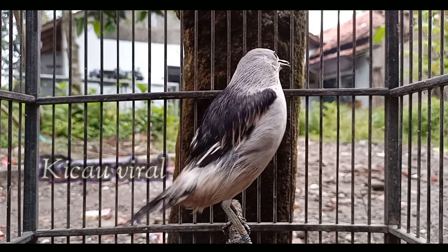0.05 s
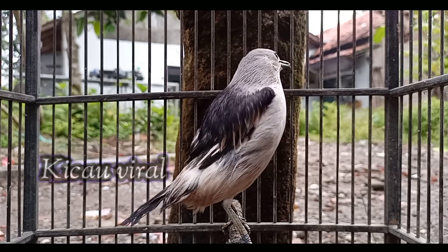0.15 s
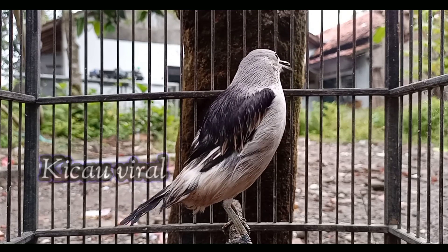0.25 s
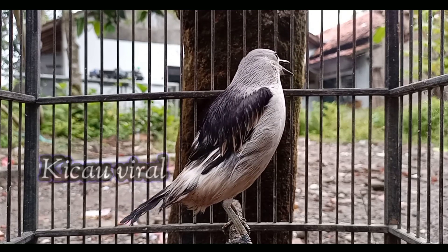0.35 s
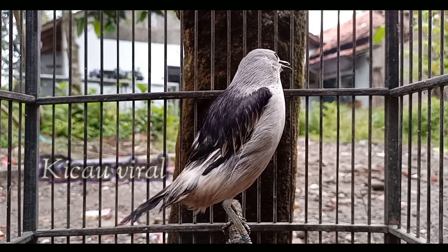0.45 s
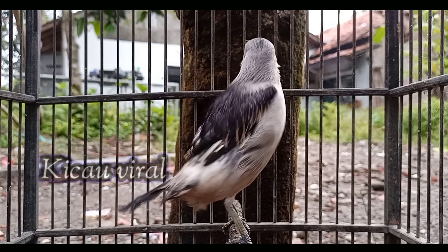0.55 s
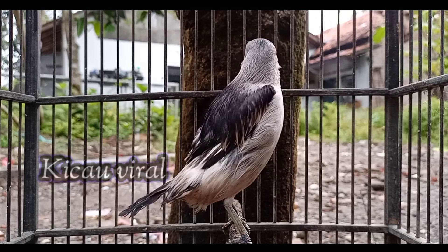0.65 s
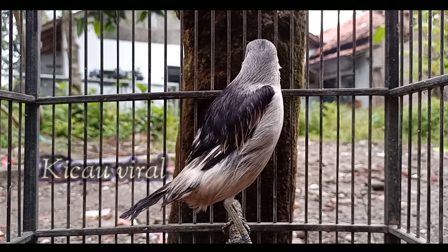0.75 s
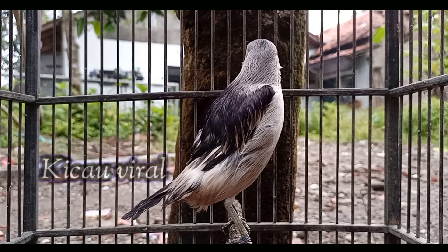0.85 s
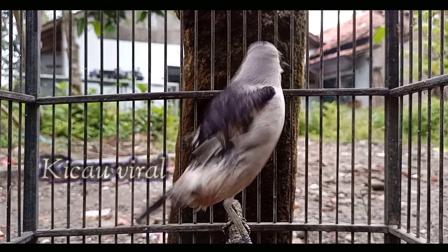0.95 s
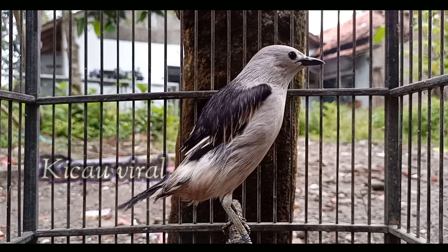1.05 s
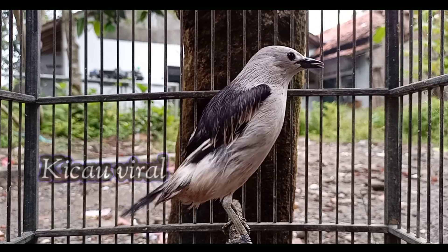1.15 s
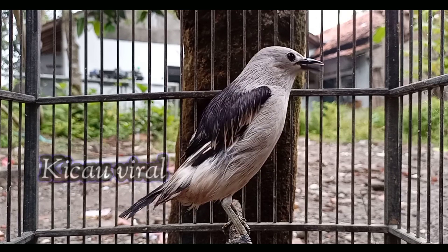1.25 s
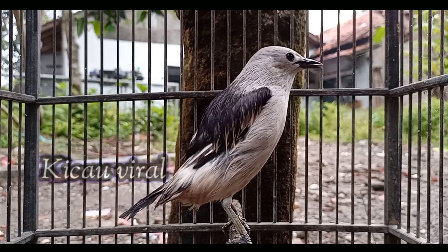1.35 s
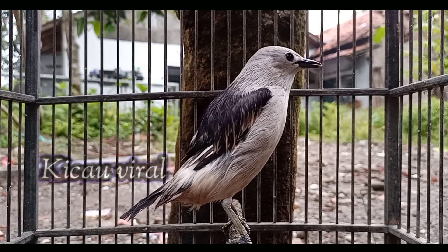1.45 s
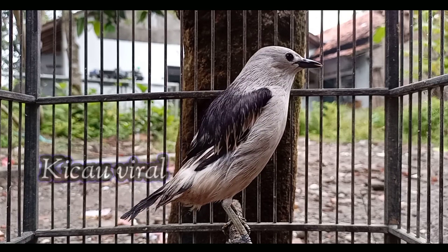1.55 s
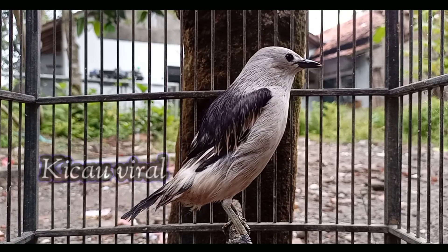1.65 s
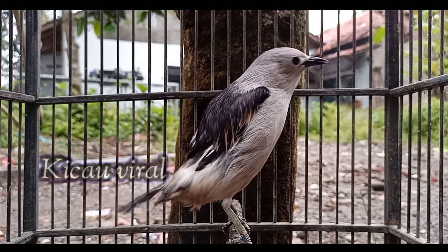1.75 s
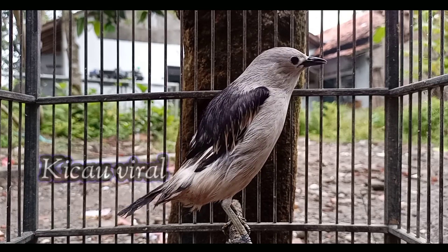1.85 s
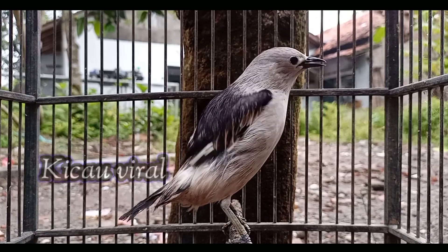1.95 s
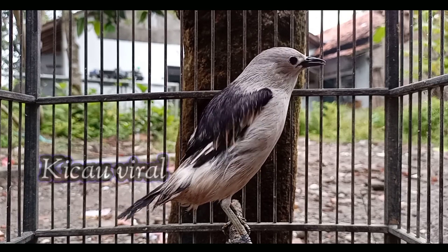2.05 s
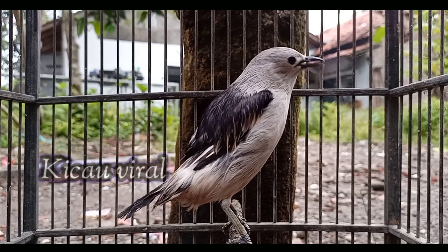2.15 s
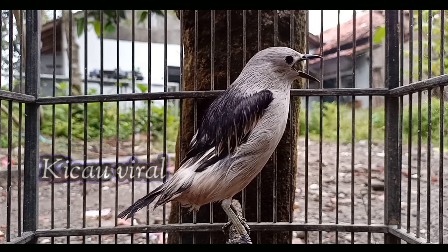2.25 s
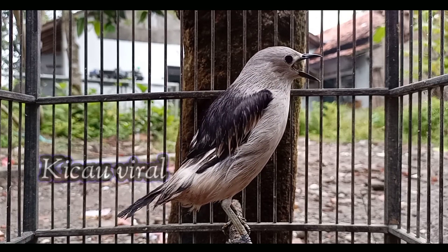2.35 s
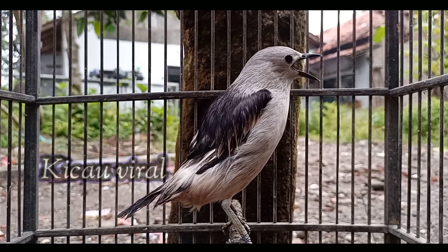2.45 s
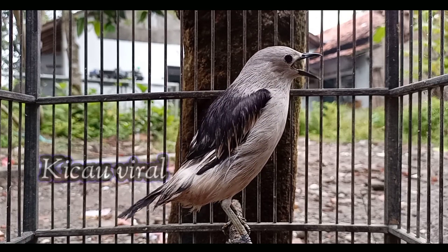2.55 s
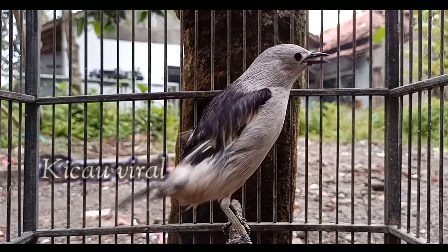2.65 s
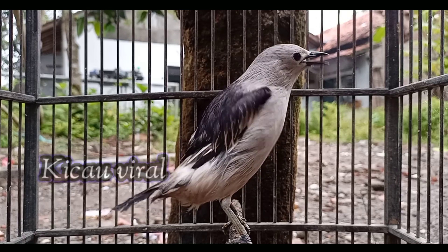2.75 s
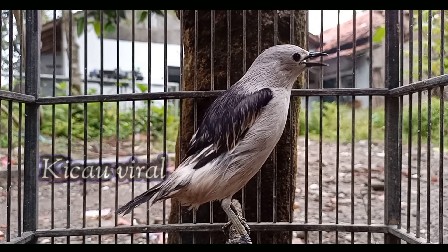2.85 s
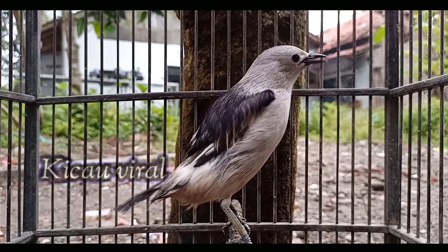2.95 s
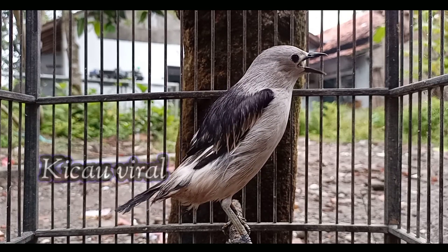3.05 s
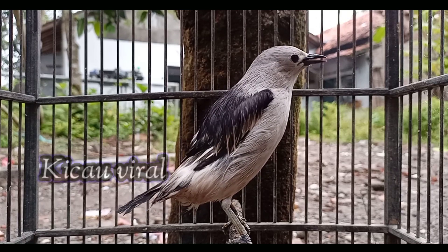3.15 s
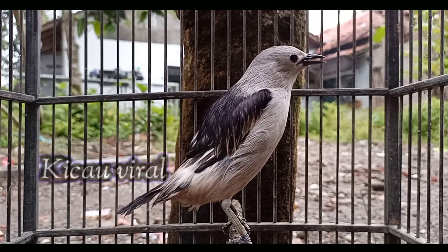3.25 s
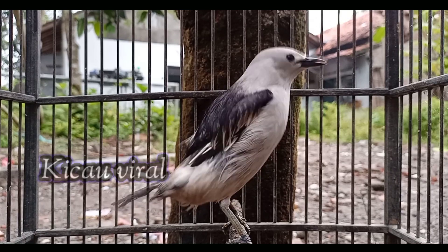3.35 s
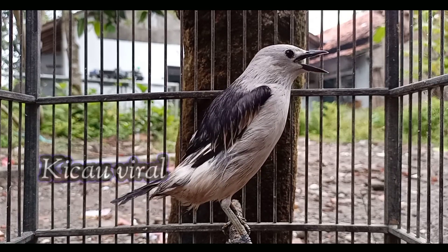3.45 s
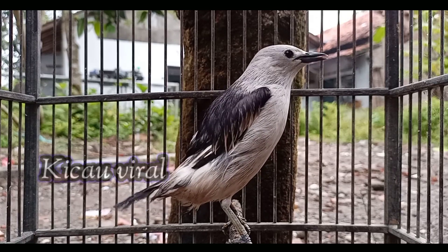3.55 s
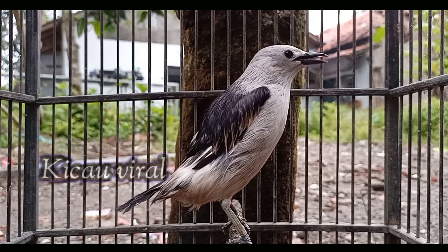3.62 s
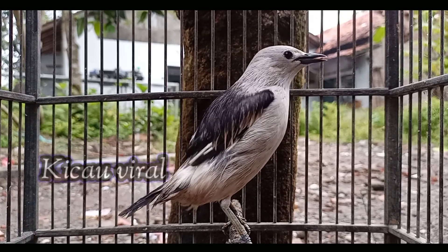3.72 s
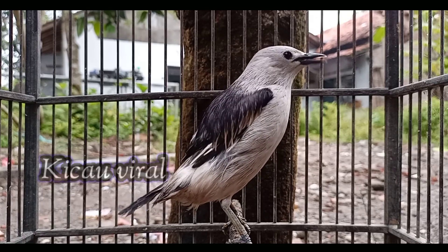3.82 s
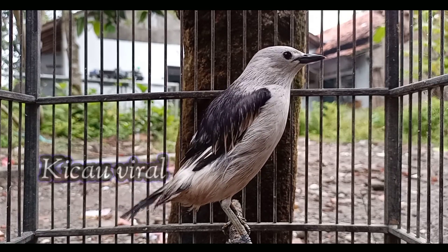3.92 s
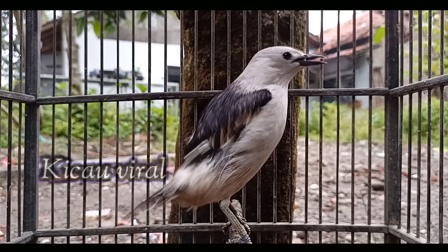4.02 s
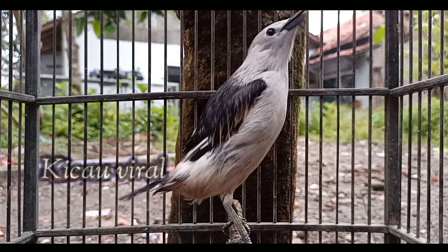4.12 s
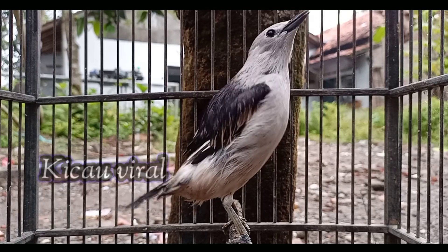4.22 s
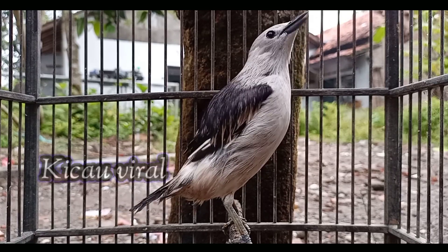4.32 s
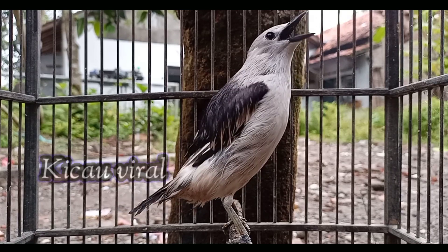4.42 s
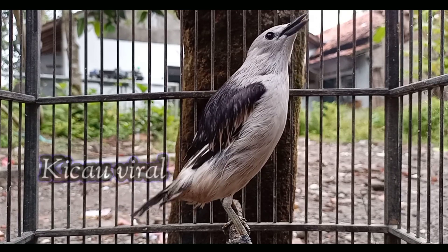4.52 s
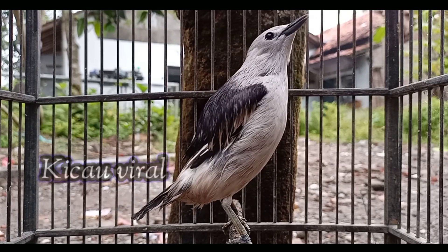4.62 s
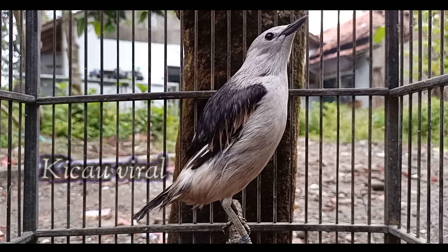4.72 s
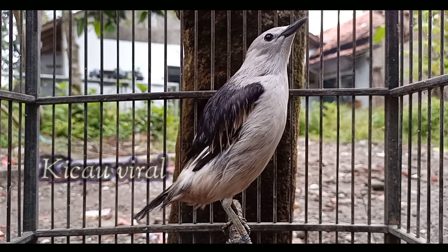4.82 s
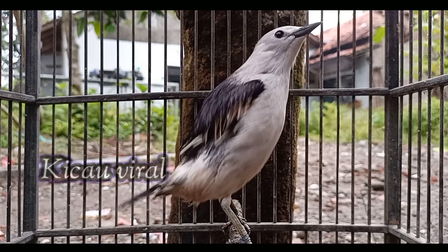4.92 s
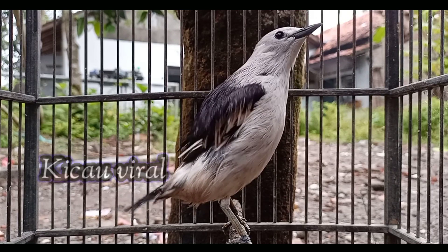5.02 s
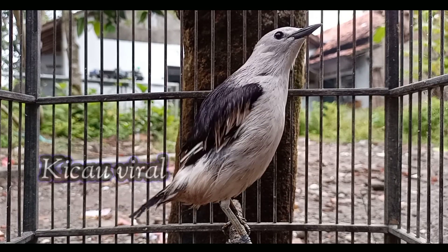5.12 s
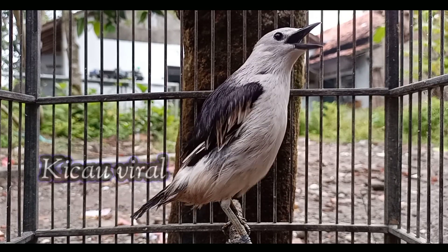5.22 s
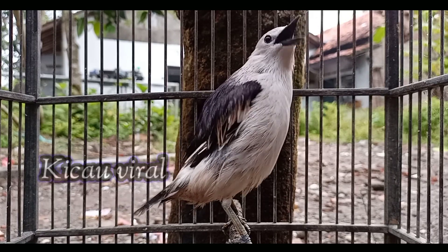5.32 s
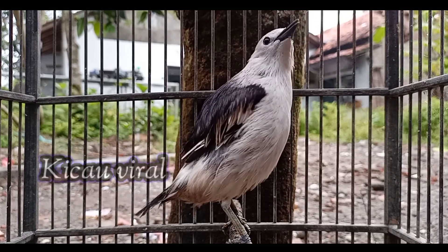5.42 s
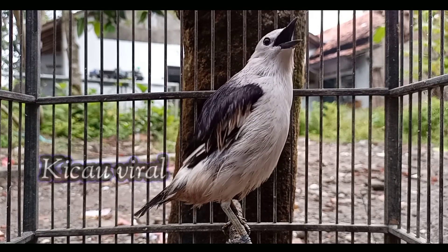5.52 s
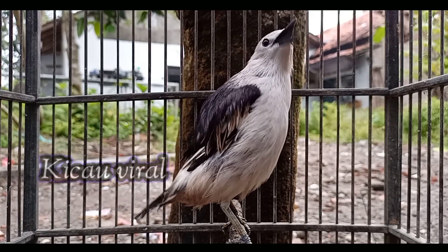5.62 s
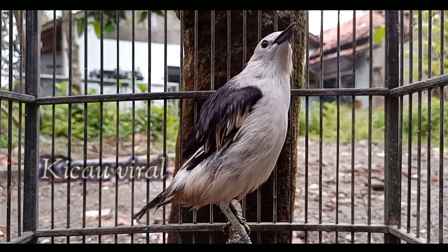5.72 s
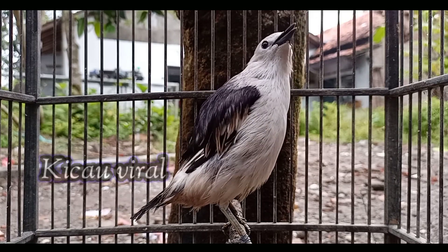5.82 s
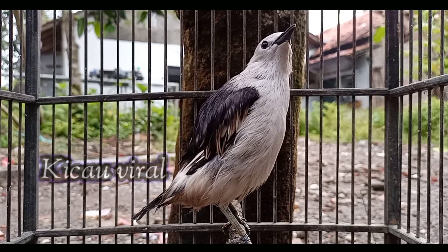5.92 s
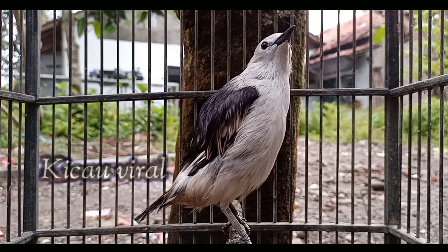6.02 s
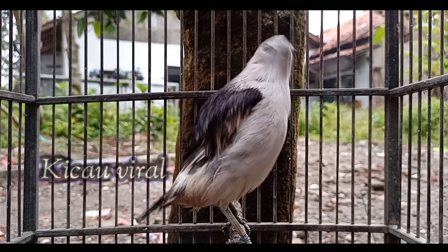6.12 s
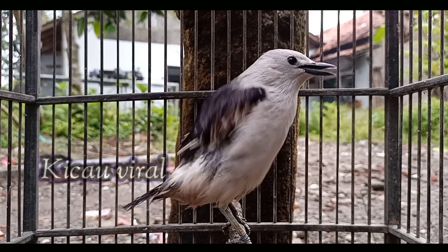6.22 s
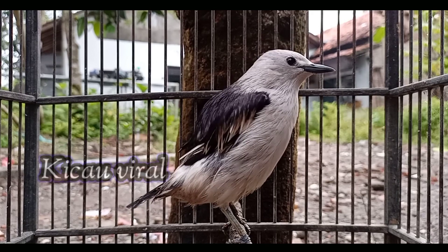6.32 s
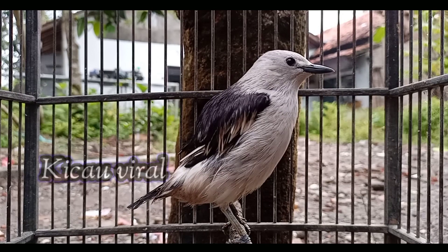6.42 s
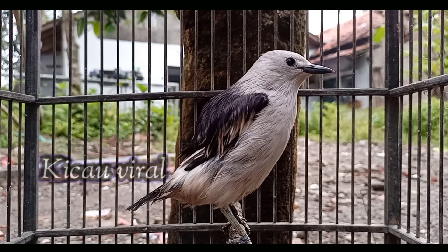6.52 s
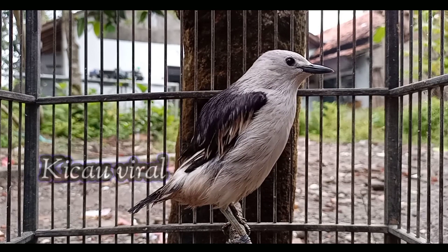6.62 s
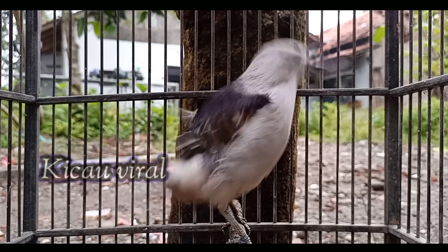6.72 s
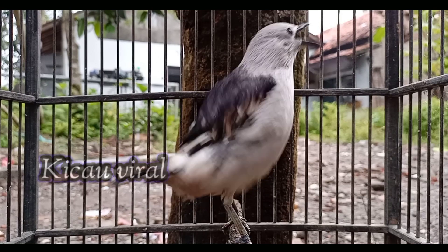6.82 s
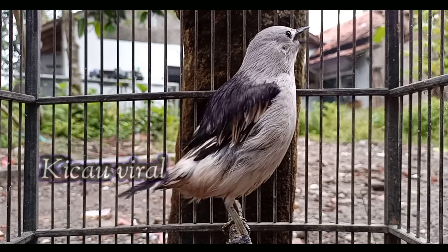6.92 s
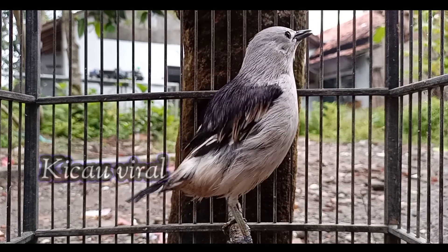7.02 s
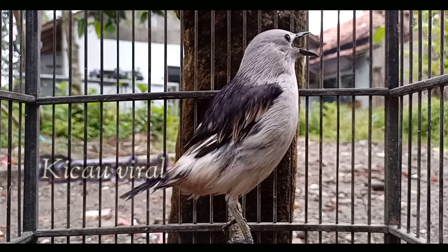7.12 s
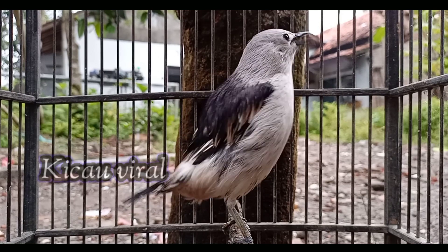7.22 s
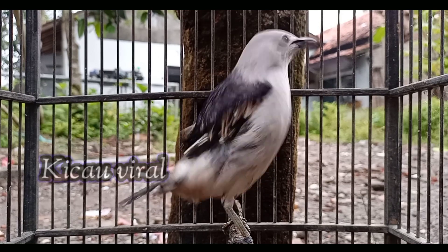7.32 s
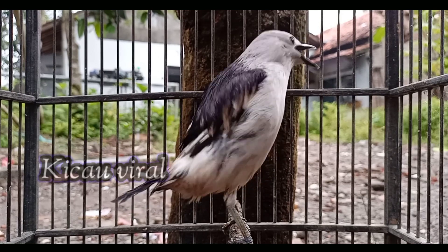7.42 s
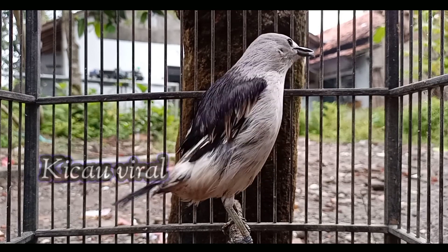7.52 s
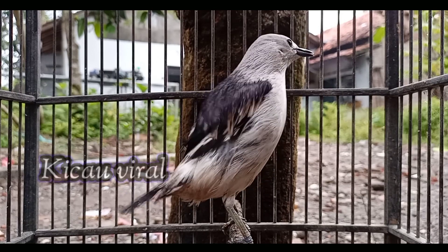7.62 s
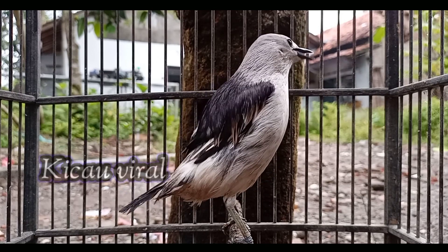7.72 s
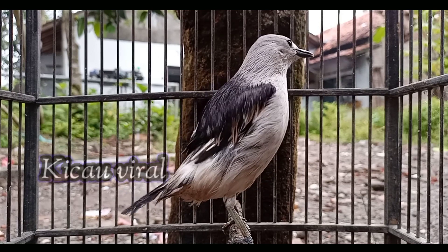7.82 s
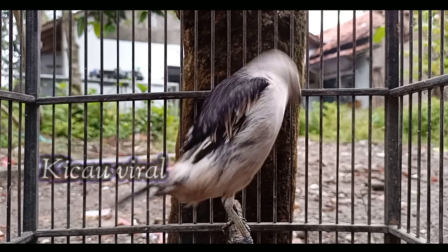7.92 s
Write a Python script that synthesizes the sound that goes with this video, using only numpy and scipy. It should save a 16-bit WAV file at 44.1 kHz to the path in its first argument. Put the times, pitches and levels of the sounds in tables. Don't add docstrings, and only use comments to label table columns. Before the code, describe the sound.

Outdoors in a yard, one bird dominates, crisp and close. Fast chirps and two-toned warbling lead to bouncing whistles, a harsh rattle and soaring piercing sweeps. After a pause it gives short barking notes, a soft feather rustle, paired hoots, and finally repeated breaking squawks with tiny clicks. Traffic rumble, a faint motor pass, insect ringing and distant falling whistles stay underneath, with only a brief echo.

```python
import sys
import numpy as np
from scipy import signal
from scipy.fft import rfft, irfft, next_fast_len
from scipy.io import wavfile
from scipy.ndimage import uniform_filter1d

SR = 44100
rng = np.random.default_rng(int(sys.argv[2]) if len(sys.argv) > 2 else 0)


def waveform_to_disk(signal):
    frames = np.transpose(np.atleast_2d(signal))
    scaled = np.clip(frames, -1, 1) * 32767
    samples = np.round(scaled).astype(np.int16)
    wavfile.write(sys.argv[1], SR, samples)


def gain_from_decibels(decibels):
    exponent = np.asarray(decibels, float) / 20
    return 10 ** exponent


N = 351477

# share of length (0-1), share of the glide to the aimed pitch, under_db
DROOP = [(0, 0.15, -7), (0.351, 0.28, 1.5), (1.001, 0.82, -5)]
SNAP = [(0, 0.1, 1), (1, 0.84, -2)]
# 2nd, 3rd, 4th, 5th harmonic over the first [dB]
CLEAR = (-23.5, -34.5, -48, -65)
THIN = (3, -7, -55, -64)


def curve(table, start=0, count=N):
    s, *columns = np.transpose(table)
    times = (start + np.arange(count)) / SR
    return [np.interp(times, s, column) for column in columns]


def unit(x):
    return x / np.sqrt(np.mean(x ** 2))


def wobble(hz, count=N):
    smooth = signal.butter(5, hz, fs=SR, output="sos")
    return unit(signal.sosfilt(smooth, rng.standard_normal(count + 2000))[2000:])


def swing(hz):
    return 2 * np.pi * np.cumsum(hz) / SR


def colour(x, points):
    hz, db = np.transpose(points)
    size = next_fast_len(len(x))
    f = np.maximum(np.arange(size // 2 + 1) * SR / size, 1)
    gain = gain_from_decibels(np.interp(np.log(f), np.log(hz), db))
    return irfft(rfft(x, size) * gain, size)[:len(x)]


def echo(x, t60, damp_hz):
    t = np.arange(int(.5 * SR)) / SR
    tail = rng.standard_normal(len(t)) * np.exp(-np.log(1000) * t / t60) * (t > .003)
    tail = signal.lfilter(*signal.butter(1, damp_hz, fs=SR), tail)
    return signal.fftconvolve(x, tail / np.sqrt(np.sum(tail ** 2)))[:N]


def lumpy(x):
    lump_db = 4
    edges = [(20, 120), (120, 220), (220, 330), (330, 480), (480, 700), (700, 1100), (1100, 20000)]
    out = np.zeros(N)
    for low_hz, high_hz in edges:
        band = signal.sosfilt(signal.butter(3, (low_hz, high_hz), "band", fs=SR, output="sos"), x)
        depth_db = lump_db * min(low_hz / 220, 1, 500 / low_hz)
        out += band * gain_from_decibels(depth_db * wobble(5))
    return out


def yard():
    # pitch_hz, level_db per Hz
    traffic_colour = [(21, -35.5), (35, -14.5), (172, -4), (332, -26), (1870, -56), (2690, -44),
                      (3610, -63.5), (8000, -62.5), (10400, -76.5), (17600, -120)]
    # time_s, level_db
    motor_level = [
        (1.1, -68.5),
        (1.4, -62),
        (1.9, -47.5),
        (3.1, -52),
        (3.6, -60.5),
        (4.2, -61.5),
        (4.8, -72.5),
        (7.97, -78),
    ]
    # pitch_hz, level_db
    motor_tones = [(489.9, -70), (532.9, -78), (667.5, -69.5)]
    rumble = unit(colour(rng.standard_normal(N), traffic_colour)) * gain_from_decibels(-53.5 + 1.5 * wobble(2))
    tones = np.zeros(N)
    for hz, db in motor_tones:
        pitch = hz * (1 + .01 * wobble(4) + .03 * wobble(40))
        tones += gain_from_decibels(db + 57 + 5 * wobble(3)) * np.sin(swing(pitch))
    road_colour = [(150, 2.0), (350, 2.0), (2000, -11.5), (6000, -14.5), (9000, -64.0)]
    road = unit(colour(rng.standard_normal(N), road_colour))
    passing = gain_from_decibels(curve(motor_level)[0])
    return lumpy(rumble + passing * road) + passing * 0.92 * tones


def drones():
    # start_s, length_s, first_hz, last_hz, level_db
    hums = [(0.496, 0.34, 410, 378, -61.5), (0.894, 0.48, 815.6, 775, -74), (0.993, 0.098, 628, 594, -69),
            (1.203, 0.53, 86, 87.2, -53.5), (2.5, 0.75, 179, 177, -58), (3.753, 0.64, 720, 699, -66),
            (4.054, 0.59, 411, 390.5, -61), (4.391, 0.48, 335, 324, -59.5),
            (4.656, 0.37, 221, 221.3, -61.5), (4.853, 0.57, 652, 591, -72), (5.408, 0.19, 610, 547, -65),
            (5.606, 0.32, 217.6, 220.4, -57), (5.802, 1.6, 887, 899, -75.5), (6.0, 0.85, 1197, 1156, -82),
            (6.048, 0.22, 609, 607, -75.5), (6.352, 0.4, 251, 245.3, -58), (7.198, 0.38, 249, 247.7, -61),
            (7.6, 0.65, 490, 550, -68.5)]
    out = np.zeros(N)
    for s, length, first, last, db in hums:
        start = int(s * SR)
        count = min(int(length * SR), N - start)
        hz = np.linspace(first, last, count) * (1 + 4 / first * wobble(25, count))
        swell = np.sqrt(np.sin(np.linspace(0, np.pi, count)).clip(min=0))
        swell = swell * gain_from_decibels(db + 4 * wobble(12, count))
        out[start:start + count] += swell * np.sin(swing(hz))
    return out


def insects():
    cricket_spells = [
        [(2.7, -61), (3.8, -49.5), (3.95, -69), (4.25, -85), (4.4, -55.5), (5.13, -55), (5.3, -81)],
        [(5.7, -56), (6.374, -50.5), (6.6, -87)],
        [(6.77, -59.5), (6.85, -73), (7.2, -79)],
        [(.08, -67), (.2, -47), (1.1, -73.5), (1.25, -87)],
    ]
    # time_s, level_db
    hiss_level = [
        (2.2, -68.5),
        (2.7, -74),
        (4.8, -104),
        (5.0, -77.5),
    ]
    db = np.full(N, -95.)
    for table in cricket_spells:
        a, b = int(table[0][0] * SR), int(table[-1][0] * SR)
        db[a:b] = curve(table, a, b - a)[0]
    throb = 1 + .4 * np.sin(swing(38 * (1 + .1 * wobble(6)))) + .3 * wobble(80)
    wing = np.sin(swing(2720 * (1 + .02 * wobble(120)))) * throb * gain_from_decibels(3 * wobble(10))
    cricket = unit(wing) * gain_from_decibels(uniform_filter1d(db, size=2000))
    hiss = colour(rng.standard_normal(N), [(8000, -29), (9300, 16.5), (10800, -39.0)])
    return cricket + unit(hiss) * gain_from_decibels(curve(hiss_level)[0] + 1.5 * wobble(20))


def note(table, overtones_db, rough, half_db=-80):
    start = int(table[0][0] * SR)
    count = min(int(table[-1][0] * SR), N) - start
    hz, db = curve(table, start, count)
    hz = uniform_filter1d(hz, size=130, mode="nearest")
    grain = rough + .05
    rough = rough + np.clip((db + 25) / 25, 0, .35)
    rough = rough * np.clip((7000 - hz) / 1400, .2, 1)
    waver = 14 / hz * wobble(60, count) + .075 * rough.clip(max=.35) * wobble(250, count)
    phase = swing(hz * (1 + waver))

    orders = np.arange(1, 14.1, .5)[:, None] - .5
    shape = np.interp(orders, [0, 1, 2, 3, 4, 5], [-24, 0, *overtones_db])
    beak_hz = np.maximum(7500, orders.clip(max=5) * hz)
    fall = -5 * np.clip(orders * hz - beak_hz, 0, None) / 1000
    fall = fall - 2.9 * (orders - 5).clip(min=0)
    fall = fall - 22 * np.clip((hz - 5700) / 600, 0, 1) * (orders > 1)
    fall = fall + .31 * (db - db.max()) * (orders - 2).clip(0, 5)

    slow = signal.butter(4, 450, fs=SR, output="sos")
    fray = signal.sosfilt(slow, rng.standard_normal((len(orders), count))) * 7
    fray = 1 + gain_from_decibels(-8.5) * np.clip(orders * hz / 7400, 0, 1.5) ** 2 * fray * (orders > 1)
    gains = fray * gain_from_decibels(shape + fall.clip(min=-36) + half_db * (orders % 1 > 0))
    gains = gains * (orders * hz < SR / 2.5)

    shake = 1 + .85 * rough.clip(max=.3) * wobble(130, count) + .3 * min(grain, .6) * wobble(1000, count)
    shake = shake + gain_from_decibels(-25) * min(grain, .5) * wobble(1600, count)
    to_end = np.minimum(np.arange(count), np.arange(count)[::-1])
    edge = np.sin(np.clip(to_end / (.004 * SR), 0, 1) * np.pi / 2) ** 2
    tone = np.sum(gains * np.cos(orders * phase + .1 * orders ** 2), axis=0)
    tone = tone / np.sqrt(np.sum(gain_from_decibels(shape[1::2]) ** 2) / 2)
    out = np.zeros(N)
    out[start:start + count] = tone * shake * edge * gain_from_decibels(db)
    return out


def sing(syllables, contour, voice, rough):
    share, glide, under_db = np.transpose(contour)
    out = np.zeros(N)
    for s, length, first, aim, db in syllables:
        path = np.transpose([s + share * length, first + glide * (aim - first), db + under_db])
        out += note(path, voice[:4], rough, *voice[4:])
    return out


def far_bird():
    # start_s, length_s, first_hz, aim_hz, level_db
    dives = [
        (1.79, 0.1, 6640, 5070, -48.5),
        (2.0, 0.12, 6950, 5140, -44),
        (6.625, 0.052, 4050, 3340, -54),
    ]
    peeps = [
        (4.38, 0.083, 4600, 4600, -77),
        (6.47, .06, 3890, 3780, -95),
        (6.54, .1, 3860, 4080, -73.5),
        (6.87, 0.092, 4660, 4596, -74),
    ]
    hazes = [
        (6.47, 0.086, 5650, 4450, -82),
        (6.815, 0.057, 4370, 6000, -71),
    ]
    # share of length (0-1), share of glide, under_db
    dive = [(0, 0.01, -38.5), (0.261, 0.036, -6.5), (1.002, 1, -11)]
    peep = [(0, 0, -1), (.55, 0.8, 12), (1, .6, 13)]
    faint = (-32, -50.5, -62, -49)
    direct = sing(dives, dive, faint, .05) + sing(peeps, peep, faint, .12)
    return direct + .75 * echo(direct + sing(hazes, DROOP, faint, .3), .45, 9000)


def ticks():
    # time_s, level_db
    clicks = [(4.8564, -72), (4.8818, -46), (5.305, -60), (5.58, -58), (6.2337, -42.5), (6.926, -27),
              (7.214, -38), (7.47, -33), (7.6644, -49), (7.6944, -57), (7.757, -38.5), (7.763, -44),
              (.658, -45)]
    out = np.zeros(N)
    for s, db in clicks:
        start = int(s * SR)
        out[start:start + 60] = gain_from_decibels(db) * rng.standard_normal(60) * np.exp(-np.arange(60) / 15)
    return signal.sosfilt(signal.butter(2, 5000, "high", fs=SR, output="sos"), out)


def rustle():
    # time_s, level_db
    shake_level = [
        (4.15, -125),
        (4.3, -63),
        (4.47, -53.5),
        (4.6, -125),
    ]
    hiss = colour(rng.standard_normal(N), [(2500, -22), (5500, 4.0), (9000, -9.5), (11000, -29.0)])
    return unit(hiss) * gain_from_decibels(curve(shake_level)[0])


def rasp():
    # time_s, level_db, trill_hz (arcs a second), rattle_hz
    trill = [
        (2.292, -27.5, 51.7, 3200),
        (2.345, -22, 49.6, 4470),
        (2.39, -25, 49.3, 4865),
        (2.44, -25.5, 50.2, 4980),
        (2.5, -27, 42.7, 4900),
        (2.57, -26.5, 34.9, 4860),
        (2.67, -28, 36.9, 4700),
        (2.695, -31, 36.7, 4670),
    ]
    # time_s, level_db, pitch_hz
    pips = [
        (2.5, -31.5, 3450),
        (2.565, -23.5, 3600),
        (2.62, -18.5, 4100),
        (2.68, -19, 3910),
    ]
    # pitch_hz, level_db
    air_colour = [(1200, -33.5), (2500, -16), (3300, -2.5), (5200, -3.5), (5900, -23), (6500, -10.5),
                  (9000, -24), (15800, -33.5)]
    t = np.arange(N) / SR
    db, rate, high_hz = curve(trill)
    turn = np.cumsum(rate) / SR
    turn = (turn - turn[int(2.4 * SR)] + .5) % 1

    arc = swing(2830 * (1 - 1.05 * (turn - .5) ** 2 + .005 * wobble(200)))
    octave = 1.1 * turn * (1 + .3 * wobble(300)) * np.sin(2 * arc)
    low = np.sqrt(np.sin(np.pi * turn)) * (.6 * np.sin(arc) + octave)

    rattle = (1 + .6 * np.cos(2 * np.pi * (turn - .7))) * (1 + .45 * wobble(350))
    rattle = rattle * np.sin(swing(high_hz * (1 + .065 * wobble(300))))

    pip_db, pip_hz = curve(pips)
    angle = swing(pip_hz * (1 + 0.013 * wobble(180)))
    pip = gain_from_decibels(pip_db) * np.exp(-((turn - .74) / .13) ** 2)
    pip = pip * (np.sin(angle) + gain_from_decibels(-11.5) * np.sin(2 * angle))

    buzz = swing(1270 * (1 + .015 * wobble(400)))
    bands = sum(np.sin(k * buzz + k * k) * (1 + wobble(120)) for k in range(5, 13))
    air = unit(colour(rng.standard_normal(N) + 1.1 * unit(bands), air_colour))
    air = air * np.clip((t - 2.29) / 0.074, 0, 1)
    on = np.clip(np.minimum(t - trill[0][0], trill[-1][0] - t) / .012, 0, 1)
    return on * (gain_from_decibels(db) * (low + gain_from_decibels(-3.5) * rattle + gain_from_decibels(-2.5) * air) + pip)


def two_voices():
    # start_s, length_s, first_hz, aim_hz, level_db
    climbs = [(.37, 0.079, 2755, 3465, -35), (.458, 0.083, 2927, 3480, -38), (.503, 0.053, 3360, 3710, -49),
              (.555, 0.05, 2820, 3595, -38.5), (7.75, 0.04, 2730, 3000, -48.5)]
    strokes = [(.657, 0.033, 2660, 3530, -38), (.733, 0.025, 2700, 3540, -37.5),
               (.818, 0.036, 2860, 3530, -37.5), (7.958, 0.017, 2360, 3700, -46)]
    high_whistles = [(.385, 0.062, 5470, 5120, -27.5), (.458, 0.11, 4940, 4570, -29),
                     (.56, 0.034, 4573, 4503, -23.5), (.657, 0.099, 4095, 3580, -28.5),
                     (.746, 0.07, 3697, 3700, -26), (.836, 0.069, 3526, 3580, -30.5)]
    # share of length (0-1), share of glide, under_db
    climb = [(0, 0.1, -10), (0.302, 0.64, 7), (1, 0.61, -13)]
    stroke = [(0, 0.13, -4), (.6, 0.81, 3.5), (1.001, 1, -18)]
    mellow = (-4, -21, -43, -60)
    # pitch_hz, level_db
    coupling = [(1500, -22), (3000, 29), (8000, 21.5), (12000, -2)]
    low = sing(climbs, climb, THIN, .28) + sing(strokes, stroke, mellow, .15)
    high = sing(high_whistles, DROOP, CLEAR, .14)
    return low + high + colour(low * high, coupling)


def clear_whistles():
    # start_s, length_s, first_hz, aim_hz, level_db
    crowns = [(3.311, 0.085, 6050, 6670, -21.5), (3.715, 0.0757, 6070, 6610, -22)]
    hooks = [(1.402, 0.027, 1600, 2603, -26.5), (1.487, 0.041, 1460, 2440, -28),
             (1.576, 0.042, 1600, 2314, -29), (1.667, 0.049, 1350, 2310, -30.5),
             (1.767, 0.069, 1470, 2113, -38.5), (1.875, 0.1, 1430, 2290, -35.5),
             (1.99, 0.041, 1316, 2120, -34)]
    bows = [(1.732, 0.051, 2320, 2740, -12.5), (1.837, 0.042, 2300, 2555, -8),
            (1.95, 0.048, 2240, 2534, -10)]
    gurgles = [(2.135, .105, 1362, 1966, -25.5)]
    flicks = [(2.24, 0.066, 3560, 5040, -31.5)]
    soars = [(2.81, 0.072, 5860, 6504, -16.5), (2.972, 0.061, 5720, 6480, -17.5)]
    stairs = [(3.077, .237, 3526, 6430, -19), (3.48, .236, 3235, 6607, -15.5)]
    vaults = [(.911, 0.064, 2710, 3276, -34.5)]
    fades = [(7.76, .08, 3640, 3030, -35.5)]
    # share of length (0-1), share of glide, under_db
    crown = [(0, 0, -1), (.3, 0.93, -1.5), (.5, 1, -2.5), (1, 0.62, -13.5)]
    hook = [(0, 0, -13), (.26, 1.1, 5.5), (0.439, 1.03, -10.5), (1, 1.06, 1)]
    bow = [(0, 0, -3.5), (.15, 0.916, -14.5), (.5, 1, -26.5), (1, 0, -22.5)]
    gurgle = [(0, 0.14, -6), (.2, 0.053, -8.5), (.33, 1, -9), (.39, 0.74, -4), (.64, 0.2, -4.5),
              (.71, 1.635, 1.5), (.78, .8, -17.5), (.88, 0.43, -5.5), (1, .9, 3.5)]
    flick = [(0, 0, -2), (.3, .2, -2), (0.801, .97, -12), (1, 0.6, -11)]
    soar = [(0, 0.22, -13), (.4, .6, 1), (.7, 1, -2.5), (1, 0.84, -20)]
    stair = [(0, 0.011, -27), (.12, 0.29, -5.5), (.27, .23, -6), (0.385, 0.62, 1.5), (0.708, 0.53, -4.5),
             (.88, 0.48, -19), (1.001, .75, -13.5)]
    vault = [(0, 0, -8), (.3, 0.99, 2), (0.548, 1, 0.5), (0.802, 0.78, -4.5), (0.999, 0.51, 9)]
    pure = (-57, -72, -53.5, -44)
    smooth = (-24, -54, -40.5, -60.5)
    dull = (-31.5, -42.5, -41, -55)
    gargle = (-6.5, -22.5, -42, -31)
    shrill = (-17.5, -53.5, -64, -54)
    flute = (-27.5, -35, -80, -76)
    twin = (-5, -25, -64, -66)
    return sum(sing(*kind) for kind in [
        (crowns, crown, pure, .1), (hooks, hook, smooth, .2), (bows, bow, dull, .06),
        (gurgles, gurgle, gargle, .12), (flicks, flick, pure, .15), (soars, soar, shrill, .2),
        (stairs, stair, flute, .1), (vaults, vault, THIN, .22), (fades, DROOP, twin, 0)])


def reedy_calls():
    # start_s, length_s, first_hz, aim_hz, level_db
    chirps = [(.04, 0.0702, 1476, 2458, -28.5)]
    cheeps = [(.275, .09, 1865, 2710, -21.5)]
    quacks = [(.178, 0.0865, 1192, 2074, -18.5)]
    leads = [(2.765, 0.065, 1106, 2730, -30), (2.93, 0.054, 1563, 2726, -29.5),
             (3.075, 0.044, 2070, 3235, -30.5), (3.465, 0.066, 1350, 3040, -36.5)]
    grits = [(2.764, 0.033, 1227, 2243, -42), (2.928, 0.0077, 1470, 2320, -53),
             (2.948, 0.0085, 3030, 5400, -51.5), (3.074, 0.041, 2006, 3060, -41),
             (3.463, 0.037, 1295, 2375, -42)]
    checks = [(3.885, .04, 1797, 1990, -11.5)]
    hoots = [(5.303, 0.17, 1069, 1455, -20), (5.577, 0.18, 1072, 1463, -20.5)]
    yelps = [(5.829, 0.1156, 1160, 1670, -28.5)]
    hiccups = [(5.945, 0.072, 2095, 1942, -22.5)]
    small_pips = [(7.819, 0.034, 1623, 1463, -36.5)]
    # share of length (0-1), share of glide, under_db
    scoop = [(0, 0.075, -7), (.22, 0.94, 3.5), (.45, 0.68, -1.5), (1, .7, -10.5)]
    hump = [(0, 0.12, -16.5), (0.3, 1, -5), (.45, 0.84, -5.5), (1.001, 0.74, -17.5)]
    lead = [(0, 0.063, -20.5), (0.401, .9, -2.5), (1, 1, -2)]
    hunch = [(0, 0.04, -20.5), (.57, 1, -18), (1, -.2, -4)]
    arch = [(0, -0.017, -11), (0.291, 0.92, -3.5), (0.549, 0.43, -3.5), (0.751, .15, -7), (1, -0.44, -26.5)]
    yelp = [(0, 0.042, -19), (0.169, 0.57, -6.5), (.27, 1, 4), (.6, .88, -3.5), (1.001, 0.757, -2.5)]
    hiccup = [(0, -.3, -13), (.14, 0.18, 3.5), (.21, .7, -1.5), (1, 0.98, -9.5)]
    # 2nd to 5th harmonic over the first [dB], then perhaps the half-orders [dB]
    reedy = (8, -2.5, -13, -28)
    nasal = (17, 2.5, -8, -12.5)
    gruff = (9.5, -13, -22, -60.5)
    gritty = (10.5, 12, 1.5, -8, -14.5)
    tight = (9, 8.5, 3, -3)
    horn = (6.7, 2.7, 7.2, 7.1)
    sour = (2, 5, 1.5, -5.5)
    blunt = (11, 1.5, -16, -18)
    odd = (-26, 15, -7, -34)
    return sum(sing(*kind) for kind in [
        (chirps, scoop, reedy, .26), (cheeps, hump, reedy, .26), (quacks, hump, nasal, .18),
        (leads, lead, gruff, .5), (grits, lead, gritty, .6), (checks, hunch, tight, .08),
        (hoots, arch, horn, .11), (yelps, yelp, sour, .2), (hiccups, hiccup, blunt, .06),
        (small_pips, DROOP, odd, 0)])


def breaking_calls():
    # start_s, length_s, first_hz, aim_hz, level_db
    swells = [(4.487, 0.053, 1740, 2032, -20.5), (6.927, 0.052, 1766, 2017, -20),
              (7.215, 0.047, 1834, 2010, -22)]
    snaps = [(3.921, 0.0145, 1790, 1385, -22), (4.215, 0.01794, 2090, 1590, -18.5)]
    breaks = [(4.535, 0.029, 2052, 2160, -21), (6.974, 0.03, 1979, 2225, -20),
              (7.265, 0.027, 1975, 2224, -21.5), (7.511, .042, 2008, 2253, -17)]
    sags = [(4.563, 0.051, 2047, 1680, -22.5), (7.002, 0.058, 2050, 1618, -23.5),
            (7.294, .065, 2045, 1643, -24), (7.549, 0.056, 2125, 1650, -21)]
    surges = [(7.468, 0.053, 1763, 2090, -16.5)]
    caps = [(4.168, 0.046, 1830, 2064, -18)]
    # share of length (0-1), share of glide, under_db
    swell = [(0, 0.27, -13), (.15, 0.21, -17.5), (0.551, 0.5, -9), (1, 0.8, -7)]
    crack = [(0, 0, -0.71), (0.598, 0.92, -1.8), (1, 1, 0)]
    sag = [(0, 0, -0.5), (0.699, .4, -6), (0.999, 1, -4.5)]
    surge = [(0, 0, -14), (.3, .5, -18), (.8, .75, -9.5), (1, 1, -11.5)]
    cap = [(0, 0, -18), (.6, .95, -9), (.85, 1, -1), (1, .9, 0)]
    # 2nd to 5th harmonic over the first [dB], then perhaps the half-orders [dB]
    brass = (2, 8, 4.5, -0.5)
    torn = (15, 16, 7.5, 3, -10.5)
    cracked = (13.5, 9, 2.5, -9.5, -9)
    split = (15.5, 12.5, -3.5, -1.5, -2.5)
    return sum(sing(*kind) for kind in [
        (swells, swell, brass, 0), (snaps, SNAP, torn, .8), (breaks, crack, cracked, .05),
        (sags, sag, split, .14), (surges, surge, brass, 0), (caps, cap, brass, 0)])


def scratchy_notes():
    # start_s, length_s, first_hz, aim_hz, level_db
    pecks = [(1.315, 0.036, 2240, 3250, -29), (1.365, 0.028, 3490, 3953, -19),
             (1.453, 0.025, 3110, 3790, -20), (1.54, 0.03, 3150, 3676, -21),
             (1.634, 0.026, 2530, 3594, -24)]
    bursts = [(1.267, 0.0435, 3610, 4645, -30)]
    scrapes = [(7.843, 0.031, 3300, 3183, -41.5)]
    tails = [(0, 0.034, 3620, 3560, -27.5)]
    croaks = [(2.238, 0.058, 1745, 1600, -35), (3.464, 0.031, 1325, 1723, -45.5)]
    # share of length (0-1), share of glide, under_db
    peck = [(0, 0.11, -4.5), (.2, 0.91, -5), (.55, .92, -9.5), (1, 0.46, -3.5)]
    # 2nd to 5th harmonic over the first [dB], then perhaps the half-orders [dB]
    husky = (-30.5, -63, -84.5, -55)
    harsh = (-18.5, -27, -50, -60, -10)
    croaky = (-4, -27, -40, -32.5, -2.5)
    return sum(sing(*kind) for kind in [
        (pecks, peck, husky, .27), (bursts, peck, harsh, .5), (scrapes, SNAP, harsh, 1),
        (tails, SNAP, CLEAR, .5), (croaks, SNAP, croaky, 1.3)])


def song():
    slips = [0.0023, 0.012, 0.014, 0.021, 0.071, .203, 0.208, 0.23, 0.52, 0.25, .418, .431, .851, 1.9,
             1.376, 1.414, 2.4, 1.7, 2.6, 2.7, 2.5, 3.175, 2.9, 3.209, 2.8, 4.5, 4, 3.604, 4.3, 3.634,
             5.868, 5.873, 5.882, 5.896, 5.905, 5.918, 5.7, 5.974, 5.984, 5.99]
    notes = two_voices() + clear_whistles() + reedy_calls() + breaking_calls() + scratchy_notes()
    for s in slips:
        notes = notes * np.tanh((np.arange(N) / SR - s) / .0005)
    return notes


def sheen(x):
    high = signal.sosfilt(signal.butter(3, [9300, 11800], "band", fs=SR, output="sos"), x)
    hiss_colour = [(13800, -44), (14700, -6.5), (15100, 3.0), (15650, -10.5), (16000, -53)]
    hiss = unit(colour(rng.standard_normal(N), hiss_colour))
    return gain_from_decibels(-15) * hiss * uniform_filter1d(high ** 2, size=200) / gain_from_decibels(-45)


def scene():
    voice = signal.sosfilt(signal.butter(4, 950, "high", fs=SR, output="sos"), song())
    near = voice + rasp() + ticks() + rustle()
    early = gain_from_decibels(-9) * echo(near, .05, 9000)
    walls = gain_from_decibels(-22.0) * echo(near, 0.32, 4700)
    loud = uniform_filter1d(np.abs(near), size=2500)
    duck = gain_from_decibels(-5 * loud / (loud + gain_from_decibels(-23.5)))
    background = duck * (insects() + yard() + drones())
    return (near + early + walls + gain_from_decibels(12.0) * far_bird() + background + sheen(near))[None]


def roll_off(x):
    return signal.sosfilt(signal.butter(12, 16670, fs=SR, output="sos"), x)


def record(dry):
    heard = colour(dry[0], [(35, -30.0), (80, -5.0), (11300, -3.5), (13000, -20.5), (15300, -3)])
    heard = signal.sosfilt(signal.ellip(12, .2, 70, 15750, fs=SR, output="sos"), heard)
    return roll_off(heard[None])


dry = scene()
out = record(dry)
waveform_to_disk(out)
```